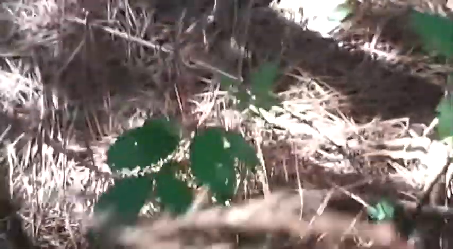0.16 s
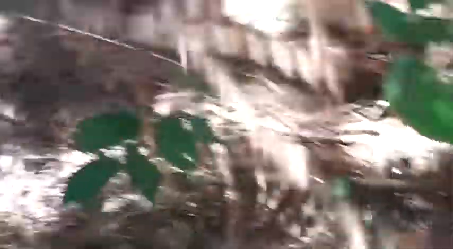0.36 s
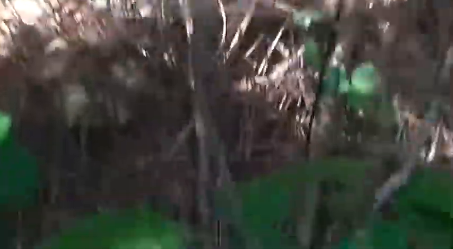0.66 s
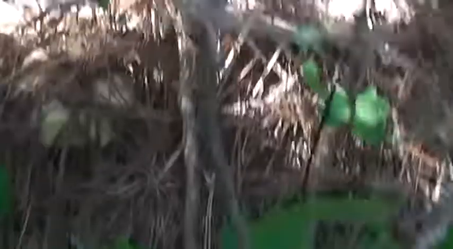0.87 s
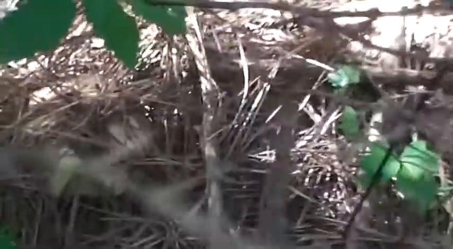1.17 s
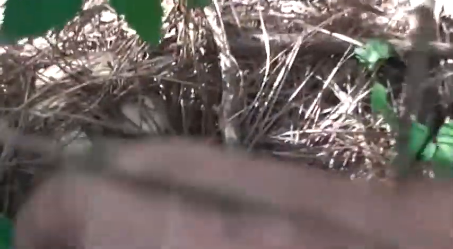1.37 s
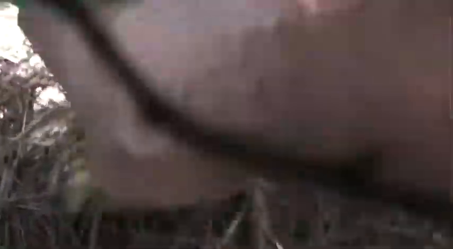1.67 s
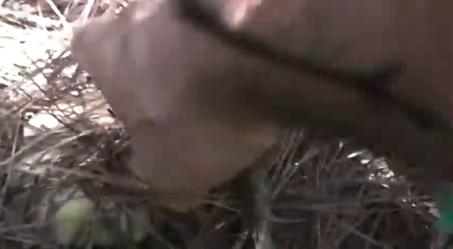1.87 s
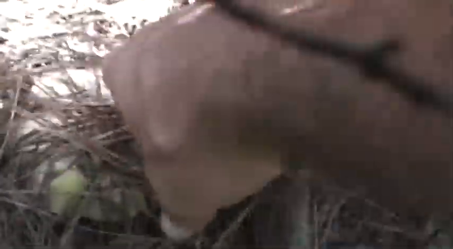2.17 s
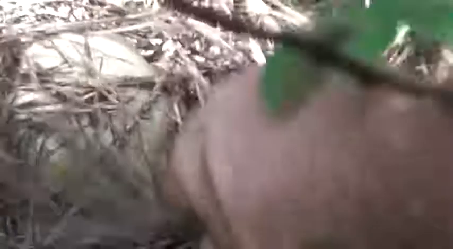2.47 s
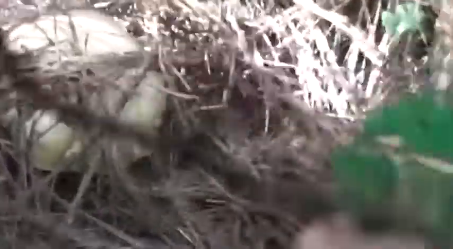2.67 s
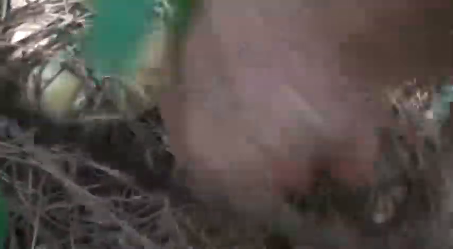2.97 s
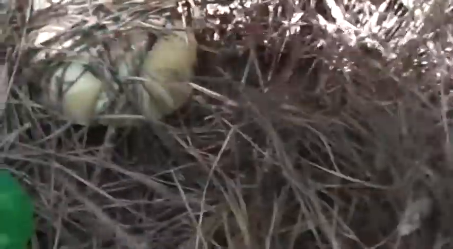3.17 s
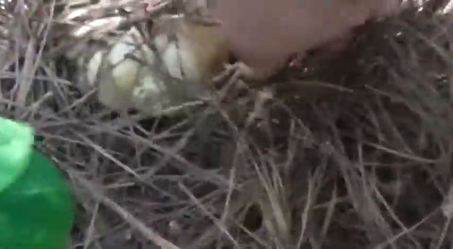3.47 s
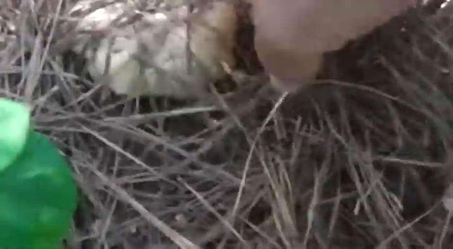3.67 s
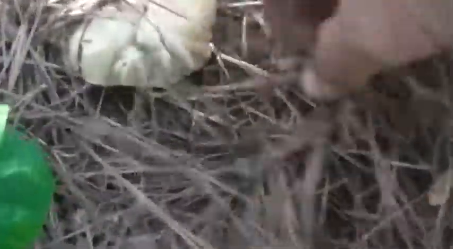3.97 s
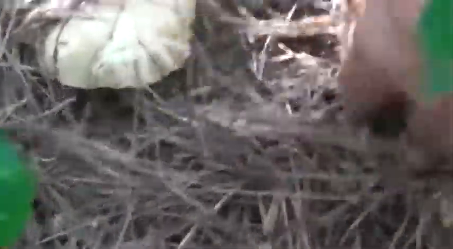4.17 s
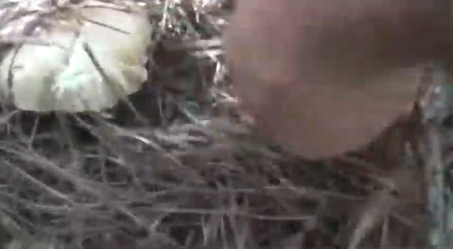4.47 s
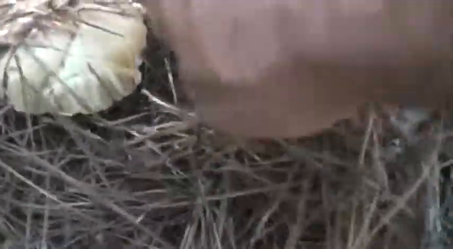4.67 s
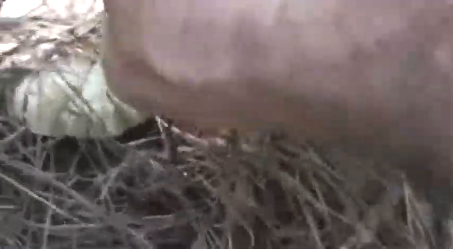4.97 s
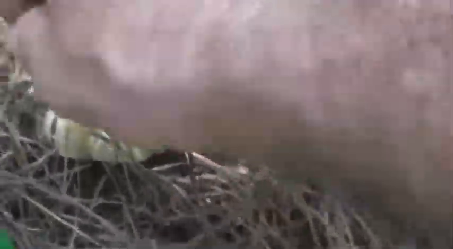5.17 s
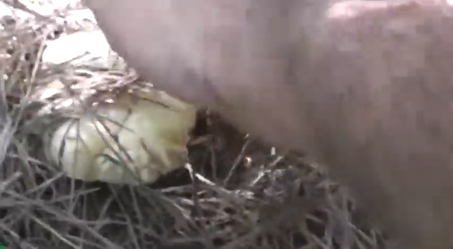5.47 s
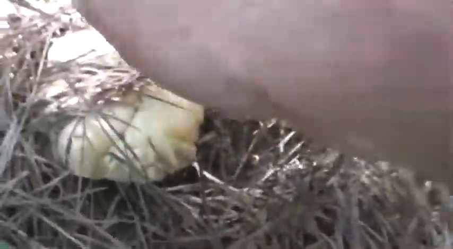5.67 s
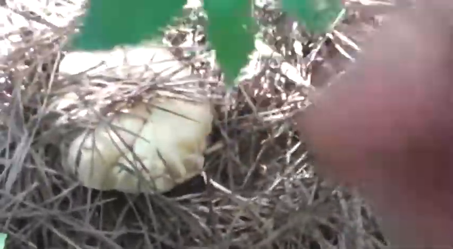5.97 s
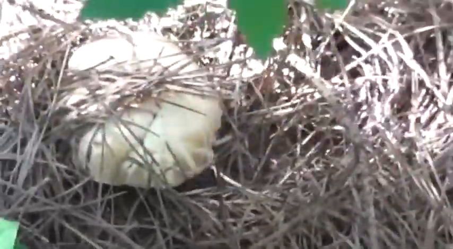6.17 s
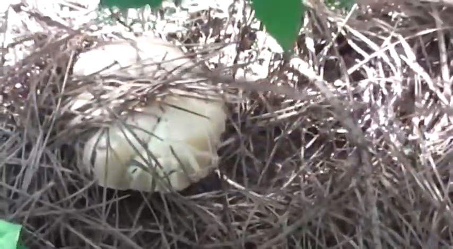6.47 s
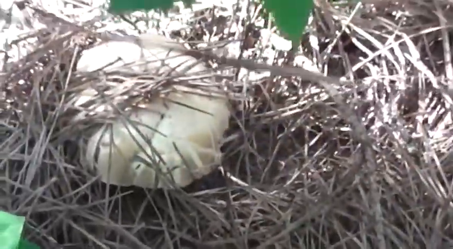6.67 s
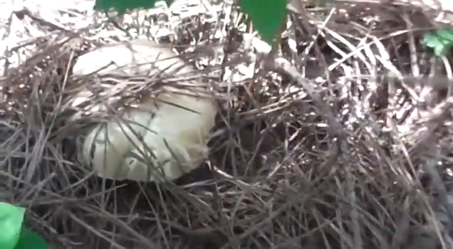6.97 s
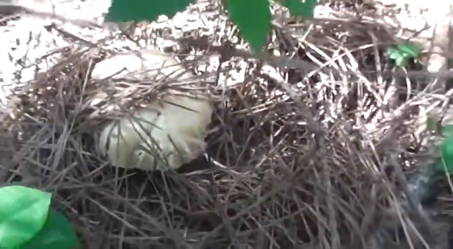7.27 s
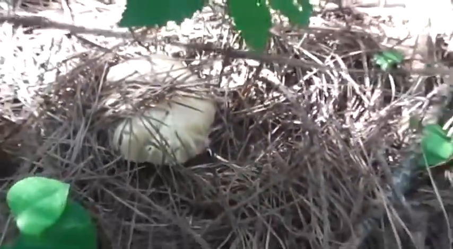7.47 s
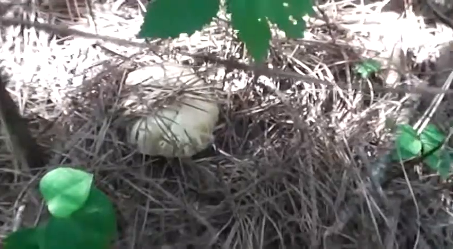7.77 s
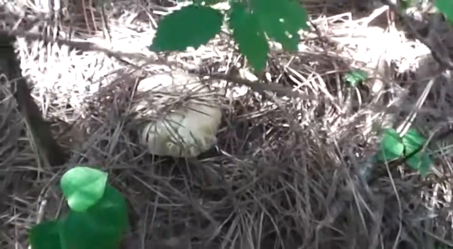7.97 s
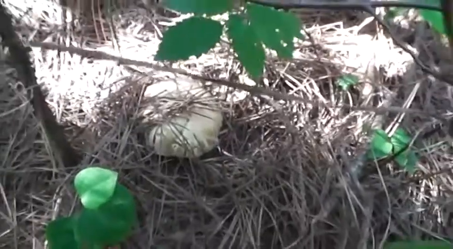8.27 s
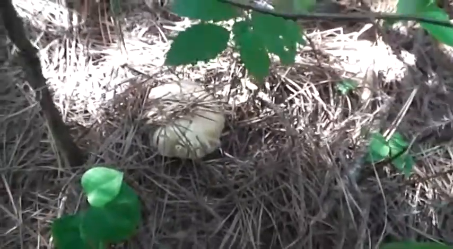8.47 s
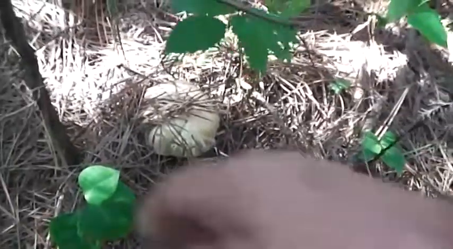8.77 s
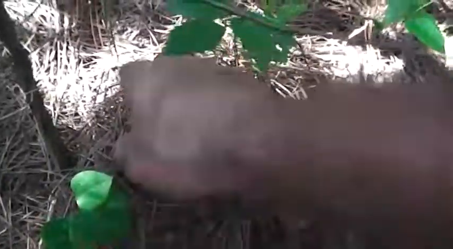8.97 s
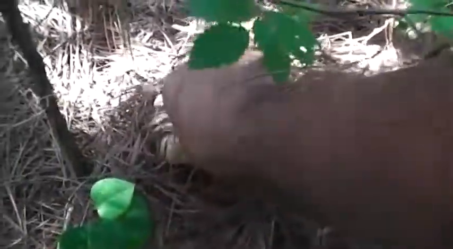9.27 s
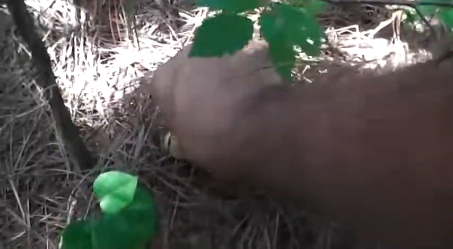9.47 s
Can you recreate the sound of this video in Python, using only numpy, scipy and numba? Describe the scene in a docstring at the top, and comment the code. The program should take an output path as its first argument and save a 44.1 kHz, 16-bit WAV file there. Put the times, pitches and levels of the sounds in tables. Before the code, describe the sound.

Close, crisp rummaging through dry needles and twigs, busiest in the first half, over a constant high insect drone and faint breeze rumble.

```python
"""A summer pine wood at ground level: a hand rakes dry needles and brush close to a camera.
Random ticks and taps ring needles and twigs; noise bursts make snaps and knocks, bent stems creak in falling tones.
The zoom motor hums for about a second. Crickets trill high, far cicadas hiss, nearer ones swell and fade:
all are fast clicks that ring or are filtered. A breeze rumbles over the microphone's own soft, steady noise.
The camera's gain control turns the sound down after loud peaks, then lets it creep back."""
import sys
import numpy as np
from scipy import signal
from scipy.fft import rfft, irfft
from scipy.io import wavfile
from scipy.ndimage import uniform_filter1d
from numba import njit

SR = 44100
rng = np.random.default_rng(int(sys.argv[2]) if len(sys.argv) > 2 else 0)


def generate_wav(signal):
    """Clip the signal to [-1, 1] and save it as 16-bit WAV at the path in sys.argv[1]."""
    frames = np.transpose(np.atleast_2d(signal))
    scaled = np.clip(frames, -1, 1) * 32767
    pcm = np.round(scaled).astype(np.int16)
    wavfile.write(sys.argv[1], SR, pcm)


N = 424241

# Strokes of the hand: (start [s], length [s], needles [dB], brush [dB], thick stems relative to brush [dB])
HAND_STROKES = [(0, 0.088, -55, -45.5, -2.5), (0.198, 0.024, -58, -66, 14.5), (0.414, 0.036, -70, -64, 12),
                (.98, 0.13, -57, -46, -7.5), (1.22, 0.04, -62, -53.5, 1), (1.354, 0.053, -50, -51.5, 5.5),
                (1.71, 0.17, -43.5, -49.5, -2), (2.057, 0.15, -43.5, -46.5, -6),
                (2.358, 0.11, -38, -42, 0.5), (2.566, 0.21, -40, -42, -6), (3.025, 0.043, -41, -44, -6),
                (3.218, 0.038, -39, -42, -8), (3.38, .04, -47, -52, -6), (3.49, 0.027, -42, -43, -4),
                (3.644, 0.02, -40, -44, 0.5), (3.714, 0.025, -40.5, -46.5, 0),
                (3.777, 0.017, -41, -56, -13), (4.027, 0.015, -38, -39, -1), (4.16, 0.072, -42, -52, -6),
                (4.257, 0.021, -42, -42.5, -4), (5.183, 0.11, -51, -56.5, -1), (5.325, .03, -49, -54, -13),
                (5.68, 0.018, -45, -56, -13), (5.968, 0.045, -57, -51.5, -2),
                (6.12, 0.079, -49, -51.5, -16), (6.275, 0.019, -55, -45.5, -7),
                (6.554, 0.067, -58, -53, -5), (6.706, 0.018, -56, -54, -5), (6.898, 0.029, -68, -52, -1),
                (6.98, .03, -63, -56, -10), (8.352, 0.092, -56, -45, -10), (8.58, .03, -47, -57, -16),
                (8.677, 0.032, -52, -42, -14), (8.72, 0.02, -54, -47, 3), (8.751, 0.096, -46, -37.5, -2),
                (8.851, .11, -44, -44, -0.5), (9.224, 0.017, -54, -46.5, -14), (9.356, .08, -67, -74, -5)]
STROKE_ATTACK_S, STROKE_RELEASE_DB_PER_S = 0.016, 269
# Background stirring of the litter by the hand, between and under the strokes:
# (time [s], needles [dB], brush [dB])
LITTER_STIR = [(0, -54, -47.5), (.27, -58.5, -57), (.9, -60, -59.5), (1.33, -62, -61), (1.46, -50.5, -49),
               (2.0, -50.5, -53), (2.3, -40.5, -44.5), (2.87, -33.5, -39.5), (3.0, -47.5, -50.5),
               (3.6, -48.5, -52), (4.1, -45.5, -54), (4.55, -46, -54), (4.9, -52, -58.5), (5.6, -56, -59),
               (5.87, -44.5, -53.5), (6.1, -52, -56), (6.7, -56, -57), (7.2, -58.5, -59),
               (8.0, -57.5, -60.5), (8.33, -58, -62), (8.5, -55.5, -53.5), (9.0, -54, -58.5),
               (9.62, -56.5, -59)]
STIR_STEMS_DB = -3  # thick stems relative to the brush
# Tone colour of the ticking needles: (frequency [Hz], level [dB])
NEEDLE_COLOUR = [(1500, -20.5), (2700, -3.5), (4000, -1), (6000, 1), (9000, 0.5), (12000, -4.5),
                 (16000, -25)]
# Ringing tones of thin twigs: (frequency [Hz], level [dB])
TWIG_MODES = [(620, -2), (780, -1.5), (960, -1.5), (1200, -0.5), (1500, 0), (1850, -4.5), (2300, -9)]
# Ringing tones of thick stems: (frequency [Hz], level [dB])
STEM_MODES = [(150, -8.5), (210, -7.5), (290, -5), (380, -2), (480, 0), (560, -5.5)]

# Single needles breaking:
# (time [s], crack peak [dB], ring relative to crack [dB], ring frequency [Hz], left minus right [dB])
NEEDLE_SNAPS = [(1.019, -32.5, 1, 6220, -15), (1.369, -34, 0, 5710, -5.5), (1.422, -30, -3, 5790, -6),
                (1.586, -26.5, -22, 5480, -.5), (1.7438, -21.5, -16, 4140, 2), (1.7504, -18, -16, 6800, 1),
                (1.7853, -27, -16, 6780, 1.5), (1.829, -28, -3.5, 5950, 2), (1.854, -29, -16, 5760, 1),
                (1.877, -22, -13, 4620, .5), (2.147, -23.5, -8, 4270, .5), (2.376, -18, -13, 5760, -9),
                (2.4249, -25, -1, 3670, -1), (2.4319, -26, -8, 6350, .5), (2.458, -18, -17, 5830, 0),
                (2.4927, -20, -18, 4580, 1.5), (2.576, -21, -17, 5650, -4), (2.7043, -12, -2, 4950, -3.5),
                (2.793, -23, 1, 6460, -1), (2.8489, -36, -17, 6460, -14), (3.033, -21, -21, 5630, 1),
                (3.044, -23, -19, 3960, 2), (3.049, -18.5, -18, 5490, 1), (3.0594, -24, -16, 6500, 0),
                (3.1263, -20.5, -17, 6000, 0), (3.249, -18, -9, 4900, -11), (3.3403, -28, -13, 5680, 1),
                (3.61, -25, -1, 5570, .5), (3.6614, -29, -11, 6430, .5), (3.7678, -29, -14, 6490, .5),
                (3.8672, -17.5, -0.5, 5160, 4), (3.9867, -26, -19, 5920, 0), (4.0178, -28, -6, 6500, -1),
                (4.041, -11, -13, 6030, 10), (4.2767, -26, -16, 4090, -.5), (4.3, -30, -12, 7500, 0),
                (5.2096, -28, -11, 6410, 1), (5.3448, -23, -8, 5900, 8), (5.696, -31, -.5, 6160, -3),
                (5.8895, -32, -8, 5860, -3), (5.8994, -27, -6, 6420, -2.5), (5.9653, -28, -3, 5860, -1.5),
                (5.9893, -30, -4, 6340, -1.5), (6.0284, -21, -2, 6440, .5), (6.1459, -31, 8.5, 4630, -3),
                (6.1734, -31, -6, 6710, -2), (6.2066, -22, -11, 5170, -11), (6.2257, -27, -2, 6340, -15),
                (6.2916, -34, -4, 6460, -9), (6.412, -30.5, -7, 6410, -8), (8.4555, -33, 6, 4340, -9),
                (8.5888, -18, -1, 5040, 7), (8.6507, -29, -2.5, 4000, -2), (8.657, -26, 6, 5000, 9),
                (8.6926, -31, 3, 4220, -10), (8.8628, -32, -3.5, 6530, -1), (8.8967, -28, .5, 6460, -4),
                (8.903, -30.5, 3, 5500, -13), (8.9516, -29, -11, 6510, -1.5),
                (8.9754, -11.5, -10, 6940, -8), (9.2396, -31, 7, 6040, -17)]
# Needles crushed in a bunch: (time [s], crack peak [dB], ring relative to crack [dB], ring frequency [Hz],
# left minus right [dB], length [ms], ring's time to fall 60 dB [ms])
NEEDLE_CRUNCHES = [(1.017, -38.5, 5, 5750, -14, 55, 0.78), (1.742, -21, -23, 6000, 2, 38, 1.1),
                   (1.78, -24.5, -21, 6000, 1, 34, 1.1), (2.14, -26.5, -9, 4500, 0, 28, 1.1),
                   (2.388, -25, 11, 5960, -7, 4.6, 0.71), (2.394, -27, 7, 5600, 0, 4.2, 0.94),
                   (3.045, -28, -17, 5500, 1, 41, 1.1), (3.2427, -21, -2, 4950, 9, 15, 0.7),
                   (3.66, -33, -6, 6000, 0, 22, 1.1), (3.765, -31, -10, 6000, 0, 20, 1.1),
                   (4.268, -29, -9, 4200, 0, 35, 0.91), (5.333, -29, 2, 4030, 0, 23, 0.58),
                   (6.136, -43, 16.5, 4700, 7, 18, 5.1), (6.224, -32, 3, 4850, 12, 16, 5),
                   (8.455, -38.5, 9, 4400, -2, 12, 3), (8.585, -25.5, 4.5, 4600, -12, 18, 1),
                   (8.646, -28.5, 10.5, 4800, -3, 28, 0.7), (9.235, -32.5, 6.5, 5460, 10, 14, 0.71)]
# Twigs hitting twigs: (time [s], wood peak [dB], wood frequency [Hz], camera thump relative to wood [dB],
# left minus right [dB], time for the noise puff to fall 60 dB [ms])
TWIG_KNOCKS = [(0.095, -37, 907, -20, 1.5, 20), (0.141, -41, 439, 0, 3, 25), (0.172, -33, 651, -4, -5, 20),
               (0.211, -37, 358, 5, -5, 25), (0.343, -40, 970, -22, 0, 20), (1.021, -36, 710, -36, -5, 59),
               (1.084, -33, 900, -30, -4, 46), (1.105, -30.5, 650, -29, -5, 39),
               (1.369, -36, 480, -20, 2, 22), (1.38, -30, 460, -18, 0, 38), (1.42, -36, 480, -18, 2, 25),
               (1.451, -39, 1220, -27, -2, 27), (1.744, -36, 1660, -26, 10, 32),
               (1.781, -37, 466, -24, 3.0, 31), (2.1, -41, 541, -24, 1.5, 23),
               (2.149, -31, 476, -34, -1, 16), (2.286, -33.5, 920, -28, 2.0, 25),
               (2.374, -21, 600, -18, 0.5, 76), (2.423, -27, 1360, -24, 0, 25),
               (2.469, -29, 1270, -31, -1, 25), (2.578, -29.5, 870, -25, 0, 31),
               (2.608, -30, 543, -24, 1.0, 20), (2.704, -25, 1200, -7.5, 12, 12),
               (2.738, -15.5, 420, -20, 0.5, 48), (2.782, -25.5, 563, -7, 0, 57),
               (2.864, -28.5, 490, -11, 0, 100), (2.908, -32.5, 511, -22, 0, 25),
               (3.0315, -32, 1370, -31.5, 1.0, 35), (3.032, -28, 480, -23, 1, 17),
               (3.078, -37, 353, -5, 4, 28), (3.245, -32.5, 800, -14, 4, 16),
               (3.246, -34, 1890, -24, 5, 25), (3.289, -31.5, 1890, -25, 11, 25),
               (3.45, -39, 974, -19, 1.0, 25), (3.502, -29, 1670, -26, 2.0, 28),
               (3.61, -27.5, 590, -20, 2.0, 12), (3.636, -33, 1220, -23, 2.0, 25),
               (3.66, -32.5, 447, -25, 0, 33), (3.671, -33, 590, -20, 1, 30), (3.706, -39, 743, -21, 0, 25),
               (3.77, -37, 710, -14, 2.0, 30), (4.039, -25.5, 674, -18, -8, 67),
               (4.274, -37, 1250, -26, 1.0, 25), (4.704, -39.5, 1510, -20, 0.5, 35),
               (5.338, -38, 940, -32, 0.5, 28), (5.968, -38, 487, -22.5, -1, 27),
               (6.028, -40, 474, -20, 0.0, 16), (6.237, -39, 825, -22, -9, 50),
               (6.291, -29.5, 1380, -23, -9, 25), (6.322, -37, 845, -18, -8, 20),
               (6.605, -40, 1010, -4, 3, 22), (6.723, -37, 945, -14, 3, 46),
               (6.777, -37.5, 915, -18, 3, 34), (6.846, -42, 1000, -15, -0.5, 28),
               (6.923, -37.5, 1480, -8, -10, 38), (8.026, -42.5, 991, -24, 8, 33),
               (8.367, -29, 980, -15, 4, 9.2), (8.418, -39, 1550, -25, 0, 20),
               (8.441, -38, 1580, -19, 1, 25), (8.459, -44, 1520, -22, -14, 30),
               (8.505, -37, 815, -21, -7, 40), (8.587, -33.5, 795, -17, -8, 89),
               (8.652, -36, 1560, -21, -7, 37), (8.707, -32, 820, -23, -3, 44),
               (8.743, -28.5, 549, -13, -2, 24), (8.778, -31, 585, -18, -2, 7.8),
               (8.92, -30.5, 608, -20, -1, 35), (8.974, -20.5, 1050, -19, 7, 10),
               (8.998, -32, 440, -23, 1.5, 20), (9.235, -30.5, 830, -33, -7, 65)]
# The broad, dull blow in each knock; its level is relative to the wood
BLOW_DB, BLOW_HZ, BLOW_T60_S, BLOW_LAG_S = -4.5, 740, 0.0029, 0.001524
# A bent stem sliding: (time [s], level [dB], first frequency [Hz], last frequency [Hz], length [ms])
STEM_CREAKS = [(8.368, -43, 1560, 1300, 26), (8.385, -42, 960, 780, 46), (8.456, -42, 1540, 1500, 18)]

# Tones of the lens motor: (frequency [Hz], average level before wavering [dB])
MOTOR_TONES = [(301.5, -70.5), (479, -70.5), (899, -72), (1918, -68.5)]
MOTOR_ON_S, MOTOR_OFF_S = 6.93, 8.03

# Swelling and fading of the near cicadas: (time [s], level [dB])
NEAR_CICADA_LEVEL = [(0, -54), (3.2, -57), (3.7, -49.5), (4.4, -44), (5.2, -42.5), (5.8, -44.5),
                     (6.6, -44.5), (7.5, -41.5), (7.9, -47.5), (8.5, -45.5), (8.9, -56), (9.62, -52)]
# Ringing tones of a cicada's hollow body: (frequency [Hz], time to fall 60 dB [s], level [dB])
CICADA_BODY_MODES = [(3300, .02, -16), (3650, .02, -13), (4100, .02, -14), (4370, .02, -15),
                     (4940, .05, -14), (5200, .015, -11), (5410, .015, -9), (5865, .06, -7),
                     (6100, .004, -1), (6380, .015, -5), (6600, .004, -2), (8120, .012, -13)]
# Levels of the insect choirs: (time [s], crickets [dB], far cicadas [dB])
CHOIR_LEVELS = [(0, -43, -48), (1.1, -43.5, -46.5), (2.1, -44, -47.5), (2.7, -43.5, -45), (3.3, -43.5, -44),
                (4.2, -46, -43.5), (4.8, -44, -41.5), (6.0, -44, -41), (6.6, -43.5, -41),
                (7.15, -46.5, -42.5), (7.6, -44, -44), (8.5, -45, -44.5), (8.85, -42.5, -40),
                (9.0, -46.5, -47), (9.62, -43, -46.5)]
# One row for each singing cricket: (wing frequency [Hz], time to fall 60 dB [s], level [dB])
CRICKET_WINGS = [(7230, 0.0097, 1.5), (7200, 0.0095, -3.5), (7510, 0.0099, -2), (6960, 0.0083, -6),
                 (7500, 0.019, -6.5)]
TRILL_HZ, TRILL_DEPTH = 20.05, 0.42
# Tone colour of the far cicadas: (frequency [Hz], level [dB])
FAR_CICADA_COLOUR = [(2200, -20.5), (2800, -8), (3500, 0), (4200, 0.5), (4800, -1), (6000, 3), (7000, 0),
                     (8400, -13), (8900, -42), (11000, -32)]

# Breeze on the microphone: (time [s], level [dB])
BREEZE_LEVEL = [(0, -53), (.9, -58.5), (1.6, -54), (2.9, -54.5), (3.7, -58), (4.7, -58), (6.1, -55),
                (6.55, -53.5), (6.8, -51.5), (7.6, -58.5), (8.6, -51), (9.62, -55.5)]
# Tone colour of the breeze: (frequency [Hz], level [dB])
BREEZE_COLOUR = [(15, -72), (30, -3), (60, -2), (100, 0.5), (160, -5.5), (240, -18), (400, -52)]
# Tone colour of the microphone's own noise: (frequency [Hz], level [dB])
MIC_NOISE_COLOUR = [(150, -18), (250, 2), (480, -10.5), (750, 0.5), (950, 0.5), (1300, -24), (2000, -5.5),
                    (3000, -2), (9000, -40), (16000, -73)]
MIC_NOISE_DB = -56.5

DIP_HZ, DIP_WIDTH_HZ, DIP_SHARE = 2790, 710, 0.26  # hollow in the microphone's response
TOP_HZ = 15900  # the microphone path passes nothing much above this


def rake():
    """Countless needles slip and tick; twigs and stems drag and ring dully, all in quick fits."""
    needle_gain, brush_gain, stem_gain = strokes()
    fits = undb(2.27 * walk(90))
    ticks = clicks(3000, 2.8, .4) * fits
    # the finest ticks come from all round the microphone, a little more from the right
    high_pass = signal.butter(2, 10500, "high", fs=SR, output="sos")
    fine = signal.sosfilt(high_pass, clicks(4000, 2.0, 1.12) * fits)
    needles = colour(ticks, NEEDLE_COLOUR) + sides(-1.6, -0.7) * unit(fine)
    taps = unit(clicks(600, 3.5, .3))
    twigs = brush_gain * rubbed(TWIG_MODES, taps, 0.0085)
    stems = stem_gain * rubbed(STEM_MODES, taps, 0.018)
    # the wood follows the fits much less than the needles do
    return needle_gain * needles + sides(0., 1.4) * fits ** 0.21 * (twigs + stems)


def strokes():
    """Gains of needles, brush, stems: strokes rise, hold and die over a rising and falling stirring."""
    t = np.arange(N) / SR
    needles_db, brush_db = curves(LITTER_STIR)
    power = undb(np.array([needles_db, brush_db, brush_db + STIR_STEMS_DB])) ** 2
    for s, length, needles_db, brush_db, stems_db in HAND_STROKES:
        i, j = int(s * SR), int((s + length + .4) * SR)  # leaves room to die away
        age = t[i:j] - s
        rise = np.clip(age / STROKE_ATTACK_S, 0, 1)
        fall = undb(-STROKE_RELEASE_DB_PER_S * np.maximum(age - length, 0))
        levels = undb([[needles_db], [brush_db], [brush_db + stems_db]])
        power[:, i:j] += (levels * rise * fall) ** 2
    return np.sqrt(power)


def rubbed(modes, taps, t60):
    """Each ringing tone of the wood answers the shared taps and a scrape of its own."""
    out = 0
    for hz, db in modes:
        scrape = taps + 0.93 * unit(clicks(2000, 0.68, 0.62))
        tone = unit(ring(ring(scrape, hz, t60), hz, t60 / 4))
        out = out + undb(db + 3.0 * walk(30)) * tone
    return unit(out)


def snaps():
    """Single needles break at once; bunches give way in a short swell of noise."""
    out = np.zeros((2, N))
    for s, db, ring_db, hz, pan_db in NEEDLE_SNAPS:
        burst = fading(12, 0.56)
        add(out, s, needle(burst, db, ring_db, hz, pan_db, 1.0))
    for s, db, ring_db, hz, pan_db, length_ms, ring_ms in NEEDLE_CRUNCHES:
        swell = np.sin(np.pi * progress(length_ms))
        burst = rng.standard_normal(len(swell)) * swell
        add(out, s, needle(burst, db, ring_db, hz, pan_db, ring_ms))
    return out


def needle(burst, db, ring_db, hz, pan_db, ring_ms):
    """A noise burst excites a bright, very short crack and the brief ring of the needle."""
    crack = ring(burst, 8740.0, 0.00062) + .5 * ring(burst, 16000.0, 0.00023)
    body = ring(ring(burst, hz, ring_ms / 1000), hz, ring_ms / 2000)
    return sides(db, pan_db) * (top(crack) + undb(ring_db) * top(body))


def knocks():
    """Twigs hit twigs: a noise puff rings dull wood with an overtone and a low thump on the camera."""
    out = np.zeros((2, N))
    for s, db, hz, thump_db, pan_db, t60_ms in TWIG_KNOCKS:
        puff = fading(t60_ms, 0.39)
        wood = top(ring(puff, hz, 0.016)) + 0.3 * top(ring(puff, 1.65 * hz, 0.0046))
        wood = top(ring(wood, 1.36 * hz, 0.0015))  # soft contact dulls the top
        thump = top(ring(ring(puff, 146.0, 0.039), 119.0, 0.018))
        impulse = signal.unit_impulse(len(puff), int(BLOW_LAG_S * SR))
        blow = top(ring(impulse, BLOW_HZ, BLOW_T60_S))
        knock = wood + undb(BLOW_DB) * blow + undb(thump_db) * thump
        add(out, s, knock * sides(db, pan_db))
    return out


def creaks():
    """A bent stem sticks and slips: the slips come at a falling, unsteady rate with uneven force."""
    out = np.zeros((2, N))
    for s, db, first_hz, last_hz, length_ms in STEM_CREAKS:
        u = progress(length_ms)
        force, pace = (unit(uniform_filter1d(rng.standard_normal(len(u)), size=120)) for _ in range(2))
        hz = (first_hz + (last_hz - first_hz) * u) * (1 + .05 * pace)
        tone = (1 + .6 * force) * np.sin(2 * np.pi * np.cumsum(hz) / SR)
        swell = np.sqrt(np.abs(np.sin(np.pi * u)))
        add(out, s, sides(db, -1.7) * swell * tone)
    return out


def zoom():
    """The turning lens motor holds a few thin tones that waver in loudness and, together, in pitch."""
    t = np.arange(N) / SR
    on = np.interp(t, [MOTOR_ON_S, MOTOR_ON_S + .02, MOTOR_OFF_S - .02, MOTOR_OFF_S], [0, 1, 1, 0])
    turned_s = np.cumsum(1 + 0.0011 * walk(12)) / SR  # motor time, running slightly fast or slow
    out = 0
    for hz, db in MOTOR_TONES:
        out = out + undb(db + 3.0 * walk(9.7)) * np.sqrt(2) * np.sin(2 * np.pi * hz * turned_s)
    return on * out


def near_cicadas():
    """Buckling ribs click fast into the hollow body; each of its ringing tones wavers."""
    ribs = clicks(2500, 3.1, 0.23)
    song = 0
    for hz, t60, db in CICADA_BODY_MODES:
        song = song + undb(db + 3.8 * walk(20)) * unit(ring(ring(ribs, hz, t60), hz, t60 / 2))
    return sides(0., 1.5) * undb(curves(NEAR_CICADA_LEVEL)[0]) * unit(song)


def crickets():
    """Wing teeth click and ring each singer's wing; each trill pulses at its own drifting pace."""
    song = 0
    for hz, t60, db in CRICKET_WINGS:
        phase = 2 * np.pi * (rng.random() + np.cumsum(TRILL_HZ + 2.53 * walk(2)) / SR)
        trill = 1 + TRILL_DEPTH * np.sin(phase)
        teeth = trill * clicks(1500, 1.8, 0.49)
        song = song + undb(db) * unit(ring(ring(teeth, hz, t60), hz, t60 / 2))
    level_db = curves(CHOIR_LEVELS)[0] + 0.8 * walk(6)
    return sides(0., 0.96) * undb(level_db) * unit(song)


def far_cicadas():
    """So many distant clicks overlap that they blur into a coloured hiss."""
    level_db = curves(CHOIR_LEVELS)[1] + 1.1 * walk(10)
    return sides(0., 0.59) * undb(level_db) * colour(clicks(9000, 0.49, 0.48), FAR_CICADA_COLOUR)


def breeze():
    """Moving air on the microphone: dense random clicks filtered to a low, wavering rumble."""
    level_db = curves(BREEZE_LEVEL)[0] + 1.6 * walk(5.3)
    return sides(0., 1.6) * undb(level_db) * colour(clicks(20000, 0.66, 0.26), BREEZE_COLOUR)


def mic_noise():
    """The microphone's own soft, steady noise: dense random clicks, filtered."""
    return undb(MIC_NOISE_DB) * colour(clicks(20000, 0.87, 0.8), MIC_NOISE_COLOUR)


def ring(x, hz, t60):
    """One ringing tone struck by x; it falls 60 dB in t60 seconds."""
    r = np.exp(-np.log(1000) / (t60 * SR))
    return signal.lfilter([1, 0, -1], [1, -2 * r * np.cos(2 * np.pi * hz / SR), r * r], x)


def clicks(rate, spread_db, width):
    """Random stereo clicks of uneven size: rate a second shared, as many opposite in the two sides."""
    count = int(2 * N * rate / SR)
    size = np.zeros(2 * N)
    strength = undb(spread_db * np.minimum(rng.exponential(1, count), 4))
    size[rng.integers(2 * N, size=count)] = strength * rng.choice([-1, 1], count)
    shared, opposite = size[:N], size[N:]
    return shared + width * opposite * np.array([[1], [-1]])


def fading(t60_ms, rise_ms):
    """Noise that jumps up and dies away, falling 60 dB in t60_ms."""
    ms = np.arange(2500) / SR * 1000
    return rng.standard_normal(len(ms)) * np.minimum(ms / rise_ms, 1) * 1000 ** (-ms / t60_ms)


def progress(length_ms):
    """Goes from 0 to 1 over the length, then stays at 1."""
    return np.minimum(np.arange(3000) / SR * 1000 / length_ms, 1)


def walk(rate):
    """Smooth random wandering around 0, typically by 0.55, with a new target rate times a second."""
    k = int(SR / rate)
    steps = np.repeat(rng.standard_normal(N // k + 1), k)
    return 0.743 * uniform_filter1d(uniform_filter1d(steps, k), k)[:N]


def colour(x, shape):
    """Filters x to a tone colour without sounding ahead of it, then scales it to rms 1."""
    hz, db = np.transpose(shape)
    bins_hz = np.arange(1025) * SR / 2048
    log_gain = np.interp(np.log(bins_hz + 1), np.log(hz), db) * np.log(10) / 20
    # folding the cepstrum forward in time gives the minimum-phase response
    cepstrum = irfft(log_gain)
    cepstrum[1:1024] *= 2
    cepstrum[1025:] = 0
    response = irfft(np.exp(rfft(cepstrum)))
    return unit(signal.fftconvolve(x, response[None], axes=1)[:, :N])


def curves(table):
    """Columns of a table, drawn as lines with one value a sample."""
    s, *columns = np.transpose(table)
    return [np.interp(np.arange(N) / SR, s, c) for c in columns]


def undb(db):
    """Gain of a dB value."""
    return 10 ** (np.asarray(db) / 20)


def unit(x):
    """Scaled to rms 1."""
    return x / np.sqrt(np.mean(x ** 2))


def top(x):
    """Scaled to peak 1."""
    return x / np.abs(x).max()


def sides(db, pan_db):
    """Left and right gains, pan_db apart."""
    return undb(db + np.array([[pan_db], [-pan_db]]) / 2)


def add(out, s, x):
    """Mixes x into out at time s."""
    i = max(int(s * SR), 0)
    out[:, i:i + x.shape[1]] += x[:, :N - i]


def scene():
    """Hand, motor, insects, breeze and the microphone's own noise."""
    hand = rake() + snaps() + knocks() + creaks()
    insects = near_cicadas() + crickets() + far_cicadas()
    return hand + zoom() + insects + breeze() + mic_noise()


@njit
def follow(x, attack, release):
    """Peak follower, quick up and slow down."""
    y, e = np.empty(len(x)), 0.
    for i in range(len(x)):
        e += (x[i] - e) * (attack if x[i] > e else release)
        y[i] = e
    return y


def record(dry):
    """The microphone dips in the upper mids, gain control holds loud peaks down, and the top is cut."""
    hollow = signal.lfilter(*signal.iirpeak(DIP_HZ, DIP_HZ / DIP_WIDTH_HZ, SR), dry)
    heard = dry - DIP_SHARE * hollow
    # attack 0.0021 s, release 0.2 s; peaks over -23 dB are turned down
    peak = follow(np.abs(dry).max(axis=0), 1 / (0.0021 * SR), 1 / (.2 * SR))
    gain = np.minimum(undb(-23) / (peak + 1e-9), 1) ** 0.99
    top_cut = signal.ellip(10, .2, 80, TOP_HZ, fs=SR, output="sos")
    return signal.sosfilt(top_cut, heard * gain)


dry = scene()
out = record(dry)
generate_wav(out)
```